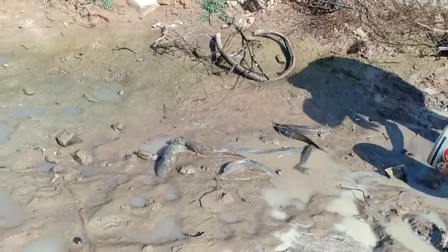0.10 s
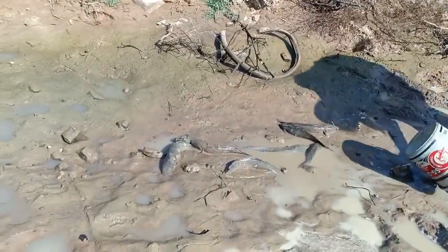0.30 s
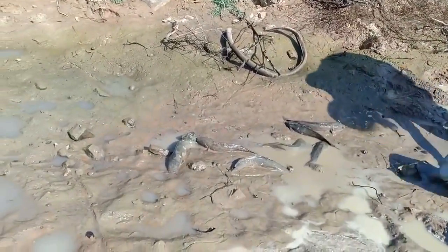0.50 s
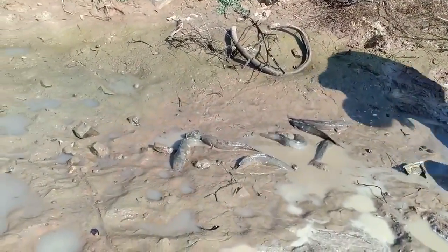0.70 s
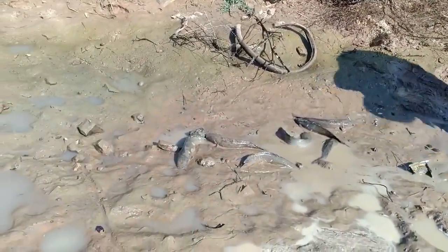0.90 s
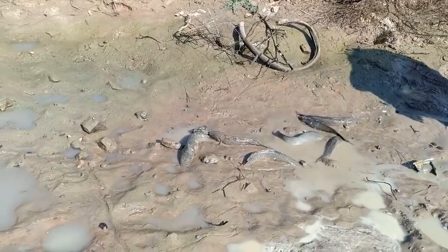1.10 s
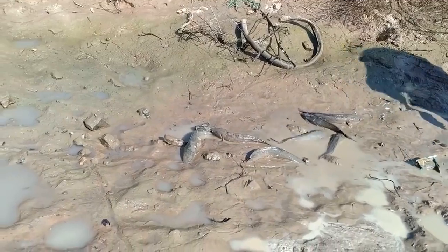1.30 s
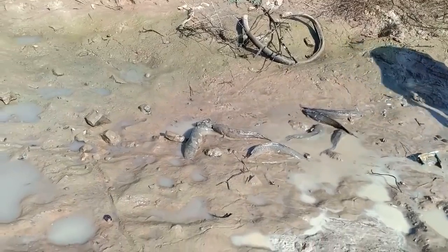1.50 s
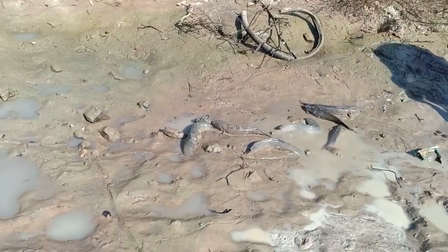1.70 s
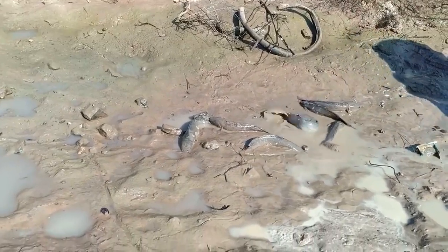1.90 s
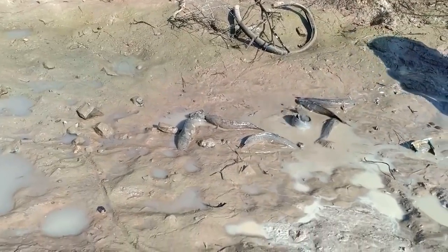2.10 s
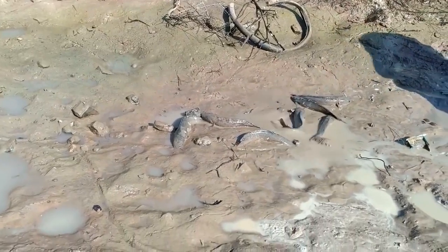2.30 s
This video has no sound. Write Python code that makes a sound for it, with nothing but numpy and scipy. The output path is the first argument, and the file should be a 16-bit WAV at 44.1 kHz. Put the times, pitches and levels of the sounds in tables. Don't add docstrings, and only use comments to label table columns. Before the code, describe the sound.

Water slopped from a plastic bucket onto mud: only soft rumble and faint hiss until 0.2 s, then the loudest bubbly slap at 0.24-0.27 with bright spray and a hollow knock. Smaller slaps and trickle continue to 0.7, last slops and dull knocks to 0.95. Near-quiet with stray drips until 1.65, then thin wet squelches, strongest near 2.1, fading as distant traffic swells slightly.

```python
import sys
import numpy as np
from scipy import signal
from scipy.fft import rfft, irfft, next_fast_len
from scipy.io import wavfile
from scipy.ndimage import map_coordinates

SR = 44100
rng = np.random.default_rng(int(sys.argv[2]) if len(sys.argv) > 2 else 0)


def linear_from_db(decibels):
    return 10 ** (np.asarray(decibels, float) / 20)


def generate_wav(sig):
    pcm = np.round(np.clip(np.atleast_2d(sig).T, -1, 1) * 32767).astype(np.int16)
    wavfile.write(sys.argv[1], SR, pcm)


N = 105840

# (frequency [Hz], width [Hz], gain [dB])
LEFT_CAVITY = [(2673, 714, 6.5), (6100, 980, 9.5), (13500, 740, 15)]
# (frequency [Hz], width [Hz], gain [dB])
RIGHT_CAVITY = [(1470, 2560, -5.5), (5830, 2400, 9), (15300, 2600, 12)]


def unit(x):
    return x / np.sqrt(np.mean(x ** 2) + 1e-20)


def along(points, hz):
    f, value = np.transpose(points)
    return np.interp(np.log(hz + 1), np.log(f + 1), value)


def over_time(points):
    seconds, value = np.transpose(points)
    return np.interp(np.arange(N) / SR, seconds, value)


def wobble(rate, size):
    knots = rng.standard_normal(int(size * 1000 / SR) + 4)
    return map_coordinates(knots, [np.arange(size) * rate / SR])


def filtered(x, response):
    m = next_fast_len(x.shape[-1] + 4096)
    spectrum = rfft(x, m) * response(np.fft.rfftfreq(m, 1 / SR))
    return irfft(spectrum, m)[..., :x.shape[-1]]


def resonances(f, peaks):
    parts = [1 + (linear_from_db(db) - 1) * 1j * f * width / (hz * hz - f * f + 1j * f * width)
             for hz, width, db in peaks]
    return np.prod(parts, axis=0)


def splashes():
    # (time [s], peak [dB], bubble pitch [Hz], t60 [s], brightness [dB/octave])
    pour = [(0.2165, -36, 2170, 0.063, -4), (0.2408, -12.5, 2395, 0.11, 2.5), (0.2493, -17, 2400, 0.1, -4),
            (0.2575, -11.5, 2190, 0.055, -3.5), (0.2646, -7.5, 1697, 0.051, -2.5),
            (0.3426, -30.5, 1980, 0.38, -2), (0.375, -15.5, 2210, 0.039, -2),
            (0.3854, -17.5, 2310, 0.05, -0.5), (0.4879, -23, 1830, 0.12, -1), (0.5225, -31, 2150, 0.059, 6),
            (0.5751, -33, 2460, 0.061, -4), (0.5883, -25, 2240, 0.1, -1.5), (0.5995, -13.5, 2135, 0.035, 4),
            (0.6085, -25, 2280, 0.04, 0.5), (0.6143, -20.5, 2160, 0.041, 4), (0.6214, -22, 2250, 0.038, -3),
            (0.6444, -34, 1910, 0.067, 3), (0.6893, -23.5, 2120, 0.085, 0)]
    # (time [s], peak [dB], bubble pitch [Hz], t60 [s], brightness [dB/octave])
    dregs = [(0.7642, -29.5, 1860, 0.053, -6.5), (0.7891, -34, 1870, 0.093, -2),
             (0.827, -31, 1960, 0.074, 0.5), (0.8541, -18.5, 1950, 0.039, -4.5),
             (0.8864, -27.5, 6830, 0.032, -14), (0.9009, -20, 2205, 0.024, 0.5),
             (0.9204, -30, 2370, 0.031, 1.5), (0.9448, -33.5, 2060, 0.049, -6),
             (1.0459, -29, 5500, 0.016, -9), (1.059, -37, 3430, 0.09, 10), (1.512, -32.5, 2190, 0.084, -4)]
    # (time [s], peak [dB], bubble pitch [Hz], t60 [s], brightness [dB/octave])
    squelch = [(1.6766, -33, 2460, 0.071, 3), (1.6881, -27, 2220, 0.06, -8), (1.735, -31, 2400, 0.056, -9),
               (1.8735, -24, 2530, 0.026, 8), (1.9106, -17.5, 1990, 0.019, -1.3),
               (1.9375, -24, 2410, 0.061, -1.2), (1.9639, -26, 2460, 0.053, 4),
               (2.0068, -20, 1970, 0.028, 0), (2.0453, -18, 1710, 0.034, 0),
               (2.0604, -20, 2080, 0.045, -5.5), (2.0827, -19, 2400, 0.041, 2),
               (2.0934, -17, 1770, 0.057, -2.5), (2.106, -9.5, 2120, 0.024, 0),
               (2.1128, -12, 2400, 0.032, 3), (2.151, -23.5, 2370, 0.16, -6.5),
               (2.1809, -22.5, 2170, 0.04, -8), (2.1994, -28.5, 2430, 0.13, -8),
               (2.2228, -22.5, 2270, 0.03, 1), (2.3451, -32.5, 2180, 0.076, 11.5)]
    # (time [s], peak [dB], pitch [Hz])
    drips = [(0.243, -16, 1007), (0.241, -2, 5910), (1.28, -43, 3360), (1.512, -31, 1645),
             (1.7855, -13.5, 2994), (2.292, -34.5, 930), (0.2539, -17, 2380), (.269, -17, 1750),
             (0.2773, -24, 2320), (0.288, -24.5, 2400), (0.392, -24, 1920), (.455, -28.5, 2340),
             (.499, -38, 2330), (.54, -34, 2100), (.627, -32, 2250), (.836, -28, 2040), (0.864, -22, 2240),
             (0.977, -38, 1880), (1.693, -27, 2200), (1.7845, -19, 2400), (1.886, -26, 2520),
             (2.086, -28, 2300), (2.1, -15, 2240), (2.121, -34, 2300), (2.14, -35, 2280),
             (2.164, -28, 2180), (2.186, -25.5, 2070), (2.213, -27.5, 2120)]
    burst_db, bubble_db, spike_db = -14.5, -0.5, 2
    rise_s, highs_t60_s, split_hz = 0.0018, 0.077, 3600
    slaps = list(pour) + list(dregs) + list(squelch)
    out, t = np.zeros(N + SR), np.arange(SR // 5) / SR
    for s, db, hz, t60, tilt_db in slaps:
        shape = (1 - np.exp(-t / rise_s)) * linear_from_db(-60 * t / t60)
        noise = drops(len(t), spike_db, tilt_db)
        low, high = filtered(noise, lambda f: [f < split_hz, f >= split_hz])
        burst = shape * (low + high * linear_from_db(-60 * t / highs_t60_s))
        burst *= np.linalg.norm(shape) / np.linalg.norm(burst)
        out[round(s * SR):][:len(t)] += linear_from_db(db + burst_db) * burst
    trapped = [(s, db + bubble_db, hz) for s, db, hz, *_ in slaps]
    for s, db, hz in trapped + list(drips):
        plop = bubbles(hz, cycles=20.9)[0]
        out[round(s * SR):][:len(plop)] += linear_from_db(db) * plop
    return out[:N]


def drops(size, spike_db, tilt_db):
    # (frequency [Hz], density [dB/Hz])
    water_colour = [(250, -10), (600, -2.5), (1100, -8), (2100, 4.5), (3400, -13), (5500, -14), (7600, -33),
                    (12000, -38.5)]
    band_edges = [0, 1400, 3600, 7400, 30000]
    drops_per_s = 420

    def bands(hz):
        tilt = tilt_db * np.log2(np.clip(hz, 300, 7000) / 2200)
        colour = linear_from_db(along(water_colour, hz) + tilt)
        return [colour * (hz >= lo) * (hz < hi) for lo, hi in zip(band_edges, band_edges[1:])]

    spikes = linear_from_db(spike_db * np.array([wobble(drops_per_s, size) for _ in band_edges[1:]]))
    return unit(np.sum(filtered(rng.standard_normal(size), bands) * spikes, axis=0))


def bubbles(hz, cycles):
    rise_per_s, onset_s = 5.85, 0.002
    t, hz = np.arange(SR // 40) / SR, np.reshape(hz, (-1, 1))
    ring = np.sin(2 * np.pi * hz * t * (1 + rise_per_s * t))
    return ring * linear_from_db(-60 * t * hz / cycles) * (1 - np.exp(-t / onset_s))


def trickle():
    # (time [s], level [dB])
    flow = [(0, -71.5), (.21, -71.5), (.27, -60), (.33, -50), (.4, -50.5), (.5, -51), (.78, -58),
            (.95, -63.5), (1.06, -74), (1.3, -70.5), (1.62, -69.5), (1.7, -53.5), (1.86, -50.5),
            (2.04, -50), (2.11, -43), (2.23, -51), (2.27, -59.5), (2.4, -59.5)]
    trickle_db, surge_db, spike_db, spread_db, fizz_db = -4, 2, 3, 1, -1
    level = linear_from_db(trickle_db + over_time(flow) + surge_db * wobble(39.53, N))
    wide = linear_from_db(spread_db) * np.array([drops(N, spike_db, tilt_db=2.5) for _ in "LR"])
    centre = drops(N, spike_db, tilt_db=-6.1) + linear_from_db(fizz_db) * fizz(count=2500)
    return level * (centre + wide)


def fizz(count):
    middle_hz, spread_octaves, size_spread_db = 2400, 0.553, 8.5
    when, size = rng.random((2, count))
    size_db = -size_spread_db * np.log(size + .04)
    pitch = middle_hz * 2 ** (spread_octaves * rng.standard_normal(count))
    rows = bubbles(np.maximum(pitch, 1300), cycles=13.7) * linear_from_db(size_db)[:, None]
    at = (when * N).astype(int)[:, None] + np.arange(rows.shape[1])
    return unit(np.bincount(at.ravel(), rows.ravel())[:N])


def bucket():
    # (time [s], peak [dB], pitch [Hz], t60 [s])
    knocks = [(0.2663, -16, 301, 0.043), (0.273, -26.5, 284, 0.086), (0.319, -31, 594, 0.045),
              (0.351, -27.5, 485, 0.036), (0.355, -31, 330, 0.051), (0.488, -39, 287, 0.047),
              (0.648, -39, 323, 0.1), (0.692, -39.5, 271, 0.16), (0.764, -38.5, 286, 0.12),
              (0.795, -33, 804, 0.037), (0.823, -42, 753, 0.15), (0.8545, -20.5, 425, 0.031),
              (0.9018, -18, 298, 0.037), (0.9135, -24, 328, 0.063), (0.944, -38.5, 354.5, 0.1),
              (1.012, -43.5, 287, 0.092), (1.458, -37, 349, 0.078), (1.935, -38, 293, 0.03),
              (2.044, -35, 315.4, 0.11), (0.269, -38.5, 124.7, 0.2)]
    # (pitch ratio [-], level [dB], share of the t60 [-])
    modes = [
        (.42, -16.5, 6),
        (1.0, 0.5, 1.49),
        (1.5, -9, 0.38),
        (2.2, -59, 1.7),
        (3.4, -55, 0.13),
    ]
    knock_db, slop_db, rise_s = -2.5, -7.5, 0.00067
    mud_damps = .7
    out, t = np.zeros(N + SR), np.arange(SR // 4) / SR
    for s, db, hz, t60 in knocks:
        ring = np.zeros(len(t))
        for ratio, level_db, share in modes:
            scatter_db = 2.2 * rng.standard_normal()
            decay = linear_from_db(level_db + scatter_db - 60 * t / (mud_damps * t60 * share))
            ring += decay * np.sin(2 * np.pi * hz * ratio * t)
        noise = rng.standard_normal(len(t))
        slop = unit(filtered(noise, lambda f: 1 / np.hypot(1, f / 400 - 400 / (f + 1)) ** 3))
        knock = (ring + slop * linear_from_db(slop_db - 60 * t / t60)) * (1 - np.exp(-t / rise_s))
        out[round(s * SR):][:len(t)] += linear_from_db(db + knock_db) * knock
    return out[:N]


def spray():
    # (time [s], peak [dB], t60 [s])
    ticks = [(0.2163, -40.5, 0.03), (0.2223, -47, 0.046), (.2407, -16.5, 0.014), (0.257, -23, 0.012),
             (0.2635, -41.5, .03), (0.3724, -52, 0.026), (.4428, -60, 0.025), (0.473, -42, 0.033),
             (0.4881, -43, 0.073), (0.541, -48, 0.021), (0.5752, -42, 0.026), (.588, -39, 0.025),
             (0.598, -38.5, 0.041), (.6224, -29.5, 0.021), (.6448, -39, 0.056), (0.686, -38, 0.053),
             (.693, -36.5, 0.03), (0.7923, -45, 0.045), (0.9036, -46, .03), (1.7211, -47, .03),
             (1.7467, -45.5, 0.037), (1.7769, -41, 0.024), (1.8722, -48, .03), (1.884, -42, .04),
             (1.965, -49, 0.02), (2.0219, -58, 0.025), (2.0862, -49, 0.044), (2.1125, -47, 0.012),
             (1.512, -59, 0.019), (2.34, -42, 0.056)]
    # (frequency [Hz], density [dB/Hz])
    spray_colour = [(2500, -47), (3800, 9.5), (5500, 3.5), (7600, -10), (11000, -15), (15000, -20.5)]
    tick_db, rise_s, alike = -9, 0.00053, 0.29
    out, t = np.zeros((2, N + SR)), np.arange(SR // 8) / SR
    for s, db, t60 in ticks:
        noise = rng.standard_normal((3, len(t)))
        both, *each = filtered(noise, lambda hz: linear_from_db(along(spray_colour, hz)))
        mist = unit(alike * both + (1 - alike) * np.array(each))
        shape = linear_from_db(db + tick_db - 60 * t / t60) * (1 - np.exp(-t / rise_s))
        out[:, round(s * SR):][:, :len(t)] += mist * shape
    return out[:, :N]


def gulps():
    # (time [s], peak [dB], pitch [Hz])
    mud_bubbles = [(0.376, -22, 1100), (0.475, -40.5, 620), (0.541, -48, 490), (0.57, -39, 1130),
                   (0.587, -42, 660), (0.621, -35, 757), (0.648, -35, 694), (0.694, -42.5, 674),
                   (0.739, -47, 617), (0.765, -37, 770), (0.854, -31.5, 548), (1.733, -49, 597),
                   (2.082, -47, 473), (2.113, -42, 456), (2.186, -50, 656), (2.247, -51, 574),
                   (2.305, -45, 560)]
    gulp_db = 5
    out = np.zeros(N + SR)
    for s, db, hz in mud_bubbles:
        plop = bubbles(hz, cycles=18.7)[0]
        out[round(s * SR):][:len(plop)] += linear_from_db(db + gulp_db) * plop
    return out[:N]


def yard(x):
    yard_t60_s, yard_db = 0.046, -8
    t = np.arange(SR // 4) / SR
    tail = rng.standard_normal((2, len(t))) * linear_from_db(-60 * t / yard_t60_s)
    tail *= linear_from_db(yard_db) / np.linalg.norm(tail[0])
    return signal.fftconvolve(x[None], tail, axes=1)[:, :N]


def rumble():
    # (frequency [Hz], density [dB/Hz])
    rumble_colour = [(12, -32), (20, -6), (27, -22.5), (79, 0), (191, 1.5), (255, -6.5), (329, -5),
                     (1160, -20.5), (1500, -28), (1950, -21.5), (3300, -120)]
    # (frequency [Hz], correlation [-])
    likeness = [(30, 0.55), (100, 1), (300, 0.77), (700, 0.22), (1500, 0.039)]
    # (time [s], level [dB])
    swell = [
        (0, -2),
        (.6, 0.5),
        (1.3, -1.5),
        (1.85, 0.5),
        (2.2, 5),
    ]
    rumble_db = -57.5

    def mid_side(hz):
        turn = np.arccos(np.clip(along(likeness, hz), -1, 1)) / 2
        return linear_from_db(along(rumble_colour, hz)) * [np.cos(turn), np.sin(turn)]

    mid, side = filtered(rng.standard_normal((2, N)), mid_side)
    level_db = rumble_db + over_time(swell) + .4 * wobble(2.5, N) + 1.5 * wobble(14, N)
    return unit(np.array([mid + side, mid - side])) * linear_from_db(level_db)


def air():
    # (frequency [Hz], density [dB/Hz])
    air_colour = [(590, -76), (1000, -44.5), (1610, 1), (1980, 10), (2940, -1), (13600, -8), (16000, -8)]
    air_db = -69

    def colour(hz):
        difference = np.abs(resonances(hz, LEFT_CAVITY) / resonances(hz, RIGHT_CAVITY))
        return linear_from_db(along(air_colour, hz)) * [difference ** .5, difference ** -.5]

    return linear_from_db(air_db) * unit(filtered(rng.standard_normal((2, N)), colour))


def at_ports(x):
    # (frequency [Hz], lead [rad])
    left_lead = [(400, 0), (800, .9), (1500, 1.2), (2300, .7), (2900, 0)]
    left_lag_s, low_cut_hz = .00052, 139

    def response(f):
        low_cut = (1j * f / (low_cut_hz + 1j * f)) ** 2
        detour = np.exp(1j * (along(left_lead, f) - 2 * np.pi * f * left_lag_s))
        return low_cut * [resonances(f, LEFT_CAVITY) * detour, resonances(f, RIGHT_CAVITY)]

    return filtered(x, response)


def scene():
    # (frequency [Hz], width [Hz], gain [dB])
    mouth = [(1226, 306, 10)]
    puddle_cut_hz, pour_ends_s = 1200, 1.2
    slaps = splashes()
    water = slaps + yard(slaps) + trickle()
    pouring = np.arange(N) < pour_ends_s * SR
    poured = filtered(water * pouring, lambda f: resonances(f, mouth))
    puddle = filtered(water * ~pouring, lambda f: 1j * f / (puddle_cut_hz + 1j * f))
    near = poured + puddle + bucket() + spray() + gulps()
    return at_ports(near) + rumble() + air()


def low_pass(x):
    return signal.sosfilt(signal.butter(12, 16200, fs=SR, output="sos"), x)


def record(dry):
    top_hz = 15750
    mix = filtered(dry, lambda hz: hz < top_hz)
    return low_pass(mix)


dry = scene()
out = record(dry)
generate_wav(out)
```